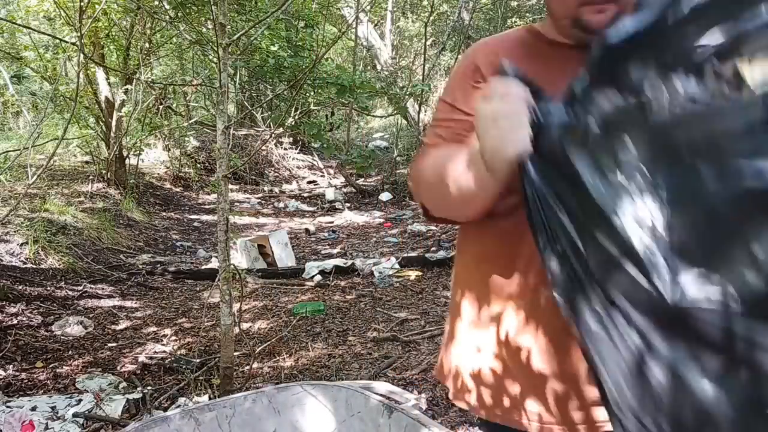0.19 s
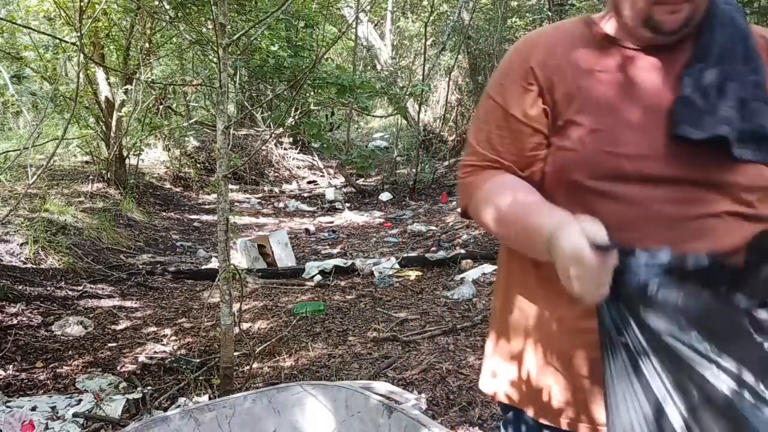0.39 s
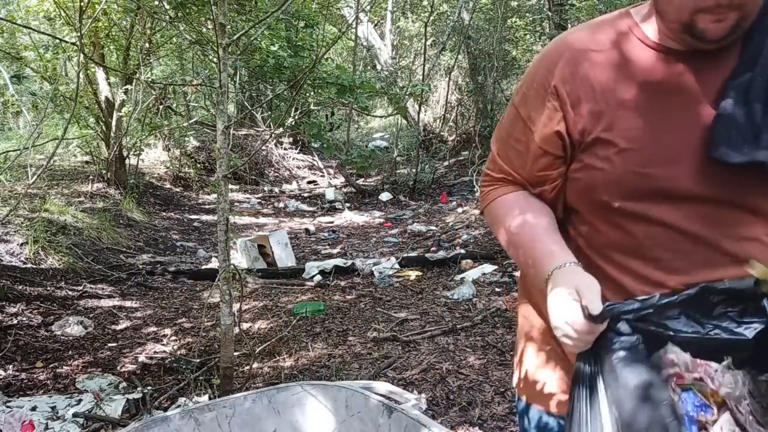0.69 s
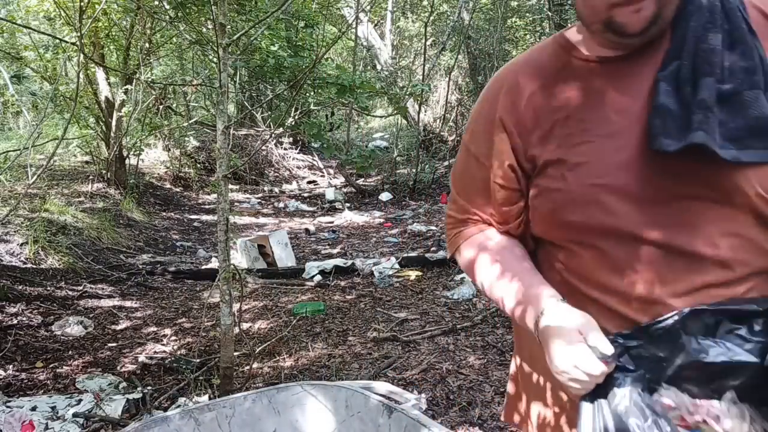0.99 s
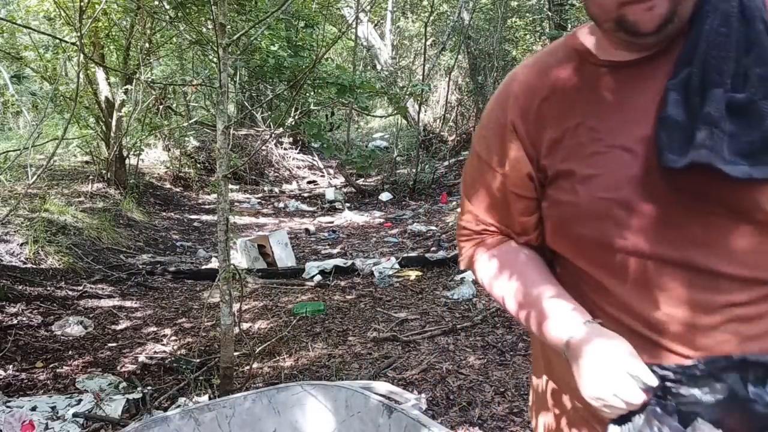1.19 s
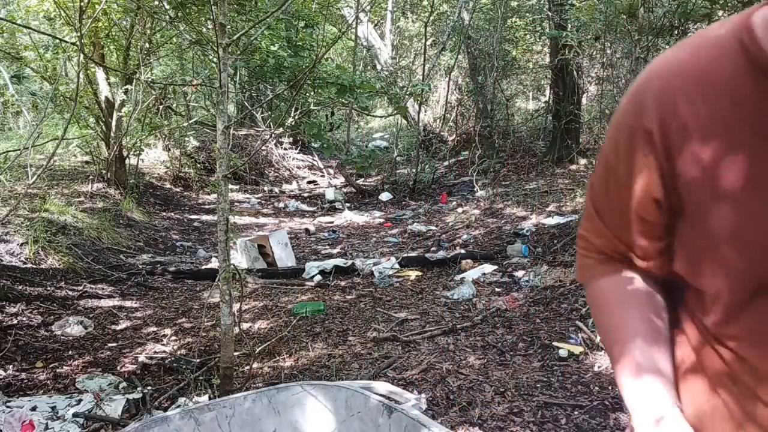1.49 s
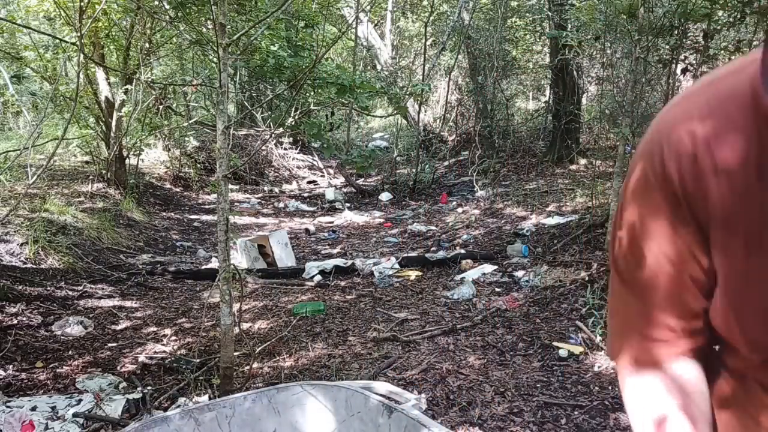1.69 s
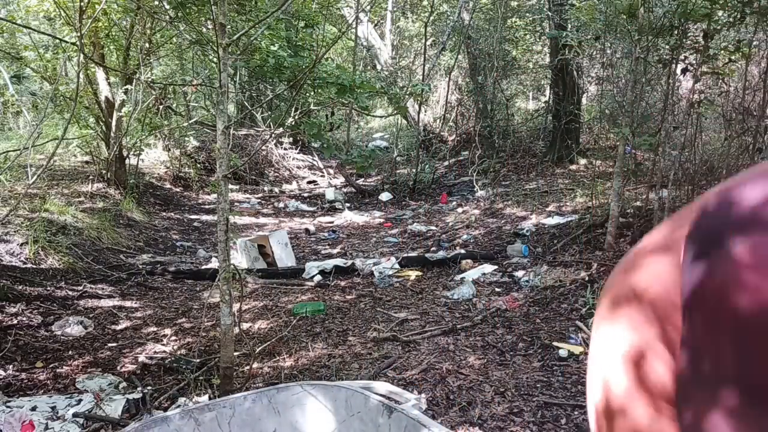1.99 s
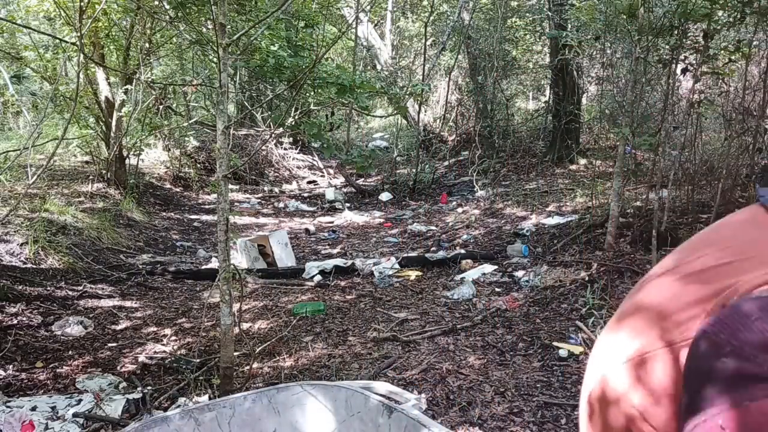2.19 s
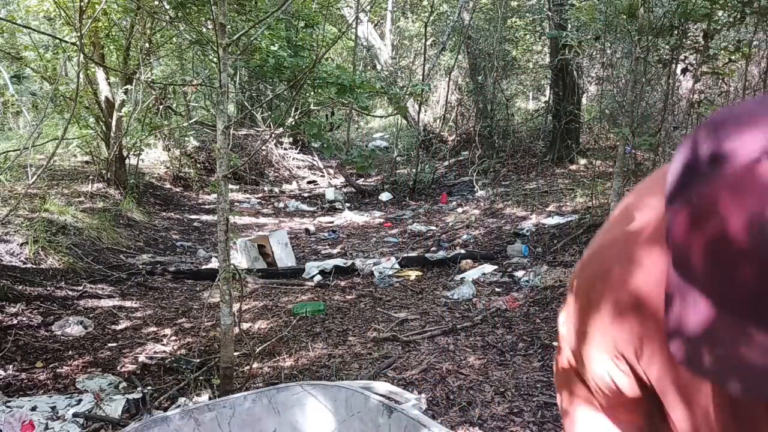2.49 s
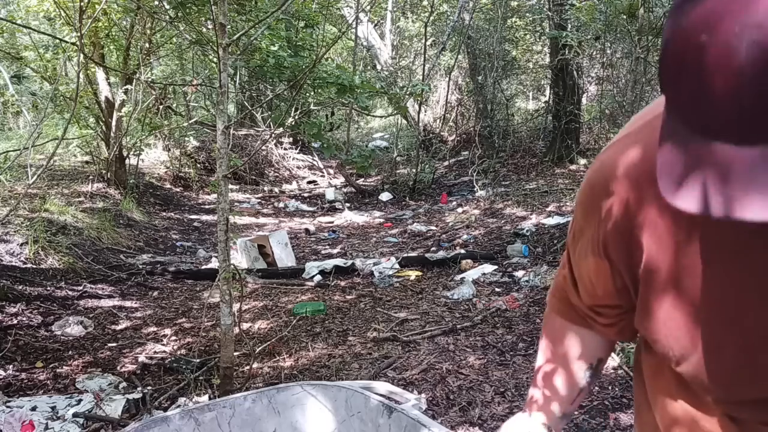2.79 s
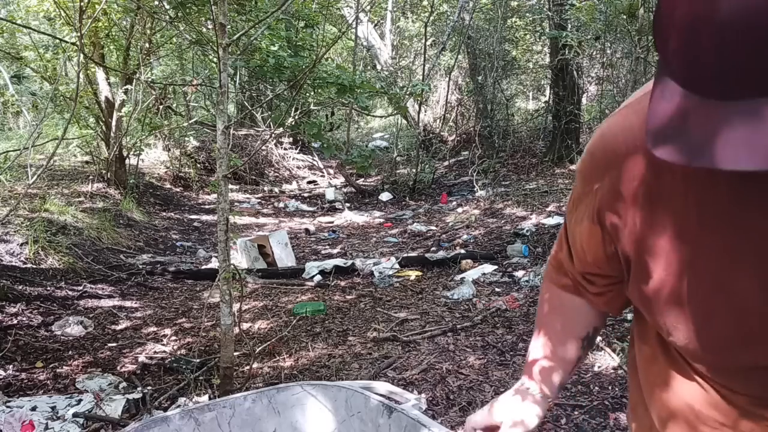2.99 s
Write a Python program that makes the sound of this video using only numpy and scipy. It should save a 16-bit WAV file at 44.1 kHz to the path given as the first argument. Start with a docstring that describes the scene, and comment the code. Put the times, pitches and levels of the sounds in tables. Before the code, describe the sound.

A thin plastic trash bag rustles, crackles and snaps in uneven bursts close by in quiet woods

```python
"""In quiet woods, a thin plastic trash bag is swung down, opened and handled close by on the right.
Clumped clicks over smooth noise make the sliding, crumpling and fluttering film; short tones flip creases.
Low noise is the air the bag shoves. Panels snap taut as noise cracks, papery slaps and sagging pops.
The bag bumps down once, softly, as two low tones close together and a dull noise knock.
A short noise tail scatters the bag's sound back from ground and trees, over steady noise for the woods."""
import sys
import numpy as np
from scipy import signal
from scipy.fft import rfft, irfft, next_fast_len
from scipy.io import wavfile
from scipy.ndimage import map_coordinates

SR = 44100
rng = np.random.default_rng(int(sys.argv[2]) if len(sys.argv) > 2 else 0)


def to_wav(s):
    """Save 16-bit WAV."""
    ch = np.atleast_2d(s).T  # columns
    pcm = np.round(np.clip(ch, -1, 1) * 32767)  # PCM
    wavfile.write(sys.argv[1], SR, pcm.astype(np.int16))


N = 136710  # length [samples]


def amp(db):
    """Decibels to gain."""
    return 10 ** (np.asarray(db) / 20)


def unit(x):
    """Scale to rms 1."""
    return x / np.sqrt(np.mean(x ** 2) + 1e-20)


def along(points, hz):
    """Read (frequency [Hz], value) points on a log frequency axis."""
    f, v = np.transpose(points)
    return np.interp(np.log(hz + 1), np.log(f + 1), v)


def curve(rows):
    """One value per sample from (time [s], value) rows."""
    s, v = np.transpose(rows)
    return np.interp(np.arange(N) / SR, s, v)


def wobble(rate):
    """A smooth random curve with `rate` knots a second."""
    knots = rng.standard_normal(N // 20)
    return map_coordinates(knots, [np.arange(N) * rate / SR], mode="wrap")


def filtered(x, response):
    """Multiply the spectrum of x by a response of frequency."""
    m = next_fast_len(N + SR // 2)
    return irfft(rfft(x, m) * response(np.fft.rfftfreq(m, 1 / SR)), m)[..., :N]


def coloured(x, points, size=4096):
    """Minimum-phase colouring: causal, so each click keeps its sharp front."""
    log_gain = np.log(amp(along(points, np.fft.rfftfreq(size, 1 / SR))))
    cepstrum = irfft(log_gain)
    # fold the cepstrum onto positive time
    cepstrum[1:size // 2] *= 2
    cepstrum[size // 2 + 1:] = 0
    impulse = irfft(np.exp(rfft(cepstrum)))
    return signal.fftconvolve(x, impulse[None], axes=1)[:, :N]


def add(track, s, sound):
    """Mix a sound into a track at time s."""
    part = track[..., int(round(s * SR)):][..., :sound.shape[-1]]
    part += sound[..., :part.shape[-1]]


# left-right likeness (frequency [Hz], coherence [0-1])
LIKENESS = [(60, 0.73), (300, 1), (600, 1), (1200, 0.55), (2500, 0.39), (5000, 0.2), (15000, 0.1)]


def spread(pair):
    """Blend two unrelated signals into left and right, with a likeness that varies with pitch."""
    def turn(hz):
        return np.arccos(np.clip(along(LIKENESS, hz), -1, 1)) / 2

    mid, side = filtered(pair, lambda hz: np.array([np.cos(turn(hz)), np.sin(turn(hz))]))
    return np.array([mid + side, mid - side])


def buckles(level, colour, rate, spread_db, rub, clump_db, clump_rate):
    """Tiny clicks of random size over the smooth rubbing of film on film, swelling in clumps."""
    happens = rng.random(N) < rate / SR
    sizes = happens * amp(spread_db * np.clip(rng.standard_normal(N), -2, 2))
    facing = 2 * np.pi * rng.random(N)
    clicks = unit(sizes * np.array([np.cos(facing), np.sin(facing)]))
    rubbing = rng.standard_normal((2, N))
    grain = np.sqrt(1 - rub) * clicks + np.sqrt(rub) * rubbing
    clumps = amp(clump_db * wobble(clump_rate))
    return unit(spread(coloured(grain * clumps, colour))) * amp(curve(level))


# sliding film, crumpling creases, fluttering large folds
# (time [s], level [dB], before the layer's trim)
SLIDE_LEVEL = [(0, -58.5), (.11, -49), (.18, -55.5), (.24, -39), (.3, -35), (.353, -25), (.395, -33.5),
               (.46, -41), (.53, -41.5), (.6, -49.5), (.8, -42), (.88, -47.5), (.97, -52.5), (1.12, -51),
               (1.26, -51), (1.31, -55.5), (1.39, -49.5), (1.48, -44), (1.59, -47), (1.68, -40),
               (1.81, -36), (1.94, -40.5), (1.99, -36), (2.14, -38), (2.175, -31), (2.21, -35),
               (2.245, -46), (2.275, -50.5), (2.31, -39.5), (2.5, -39), (2.66, -34.5), (2.74, -34),
               (2.77, -28), (2.82, -39.5), (2.9, -45.5), (2.94, -41.5), (3.1, -44.5)]
CRUMPLE_LEVEL = [(0, -68), (.11, -56), (.19, -54.5), (.24, -42), (.3, -42), (.365, -25.5), (.4, -34.5),
                 (.46, -44.5), (.53, -46.5), (.62, -54), (.72, -46), (.8, -48), (.88, -51), (.97, -58.5),
                 (1.12, -54.5), (1.3, -60), (1.39, -57.5), (1.48, -48.5), (1.6, -50), (1.8, -40),
                 (1.87, -38), (1.94, -42), (2.0, -37), (2.14, -37.5), (2.19, -32.5), (2.24, -46),
                 (2.275, -52), (2.32, -47), (2.46, -40.5), (2.53, -46.5), (2.66, -42.5), (2.78, -35),
                 (2.83, -48), (2.9, -52), (2.96, -49), (3.1, -48.5)]
FLUTTER_LEVEL = [(0, -61.5), (.17, -69.5), (.24, -49), (.3, -43.5), (.345, -32), (.378, -25.5), (.41, -35),
                 (.48, -48.5), (.57, -52.5), (.65, -56), (.715, -44.5), (.8, -55.5), (.93, -57),
                 (1.12, -53), (1.22, -65), (1.3, -57), (1.37, -75), (1.43, -53.5), (1.49, -50.5),
                 (1.55, -46), (1.67, -54), (1.78, -46.5), (1.88, -36), (2.0, -33), (2.13, -35),
                 (2.195, -33), (2.225, -43), (2.275, -51), (2.32, -39.5), (2.41, -45), (2.46, -37.5),
                 (2.53, -50.5), (2.63, -50), (2.7, -43.5), (2.79, -45.5), (2.84, -49.5), (2.9, -60.5),
                 (3.0, -53.5), (3.1, -55.5)]
# their spectra (frequency [Hz], relative level [dB per Hz])
SLIDE_SPECTRUM = [(1500, -53), (3500, -10.5), (5500, -3.5), (7000, -3), (9500, -2), (12200, 0), (14000, -2),
                  (16000, -4.5)]
CRUMPLE_SPECTRUM = [(500, -27), (1200, 0), (1900, 0.5), (2600, 0.5), (3500, 0), (4600, 0.5), (6200, -11),
                    (10000, -24)]
FLUTTER_SPECTRUM = [(20, -42), (80, -25.5), (130, -7), (170, -4.5), (230, 0), (400, 0), (600, 0),
                    (800, -0.5), (1150, -2), (1800, -8), (3000, -8), (6000, -51.5)]
SLIDE_TRIM_DB, CRUMPLE_TRIM_DB = 4.5, 3.0


def rustle():
    """Film buckles finely as it slides, more coarsely in its creases, and flutters in large folds."""
    # rate: clicks a second; rub: share of power in smooth rubbing; clump_rate: knots a second
    fizz = buckles(SLIDE_LEVEL, SLIDE_SPECTRUM, rate=7000, spread_db=11,
                   rub=0.74, clump_db=1.44, clump_rate=200)
    creases = buckles(CRUMPLE_LEVEL, CRUMPLE_SPECTRUM, rate=2200, spread_db=2,
                      rub=0.43, clump_db=1.7, clump_rate=130)
    folds = buckles(FLUTTER_LEVEL, FLUTTER_SPECTRUM, rate=600, spread_db=5,
                    rub=0.57, clump_db=1.08, clump_rate=80)
    return amp(SLIDE_TRIM_DB) * fizz + amp(CRUMPLE_TRIM_DB) * creases + folds


CREASE_RATE, CREASE_HZ = 170, 2695  # flips a second, middle pitch
CREASE_OCTAVES = 0.81  # half the reach of the pitch to either side
CREASE_CYCLES = 17  # cycles to fall 60 dB
CREASE_DB = -6.5  # relative to the untrimmed crumple level


def crinkles():
    """Single creases flip over, each ringing for a few cycles at its own pitch."""
    t, out = np.arange(SR // 50) / SR, np.zeros((2, N))
    for when, size, pitch, facing in rng.random((int(CREASE_RATE * N / SR), 4)):
        hz = min(CREASE_HZ * 2 ** (CREASE_OCTAVES * 2 * (2 * pitch - 1)), SR / 3)
        decay = amp(-60 * t * hz / CREASE_CYCLES)
        tick = size ** 2 * np.sqrt(hz) * decay * np.sin(2 * np.pi * hz * t)
        angle = 2 * np.pi * facing
        add(out, when * N / SR, np.outer([np.cos(angle), np.sin(angle)], tick))
    return unit(spread(out)) * amp(curve(CRUMPLE_LEVEL) + CREASE_DB)


# air pushed by the billowing bag (time [s], level [dB])
BILLOW_LEVEL = [(0, -69.5), (.3, -78), (.36, -43.5), (.4, -51.5), (.44, -54), (.52, -67), (.66, -71),
                (.71, -60), (.85, -69.5), (1.4, -75), (1.55, -63.5), (1.75, -70.5), (2.0, -54), (2.2, -55),
                (2.3, -66), (2.47, -55), (2.68, -74), (2.75, -58.5), (2.85, -68), (3.1, -68)]
# its spectrum (frequency [Hz], relative level [dB per Hz])
BILLOW_SPECTRUM = [(15, -30), (32, -9), (60, 2.5), (100, -3.5), (160, -10.5), (400, -46), (1500, -75)]


def billow():
    """The swelling bag shoves air, heard as low noise that comes and goes."""
    air = coloured(rng.standard_normal((2, N)), BILLOW_SPECTRUM)
    return unit(spread(air)) * amp(curve(BILLOW_LEVEL))


# woods spectrum (frequency [Hz], relative level [dB per Hz])
WOODS_SPECTRUM = [(20, -18), (60, -5), (150, -15), (500, -9), (1500, -20), (4500, -7), (8000, -14.5),
                  (16000, -24)]
WOODS_DB = -64.5


def quiet_woods():
    """A steady bed of coloured noise."""
    noise = coloured(rng.standard_normal((2, N)), WOODS_SPECTRUM)
    return amp(WOODS_DB) * unit(spread(noise))


SCATTER_DB, SCATTER_T60, SCATTER_RISE_S = -14, .085, .0015  # decay time [s], rise time constant [s]


def scatter(x):
    """A short, weak answer from the ground and the trees: a decaying noise tail."""
    t = np.arange(SR // 3) / SR
    envelope = amp(-60 * t / SCATTER_T60) * (1 - np.exp(-t / SCATTER_RISE_S))
    tail = rng.standard_normal((2, len(t))) * envelope
    echo = signal.fftconvolve(x, tail / np.linalg.norm(tail[0]), axes=1)[:, :N]
    return amp(SCATTER_DB) * echo


# panels snapping taut; levels stand before trim, and cracks and slaps before colouring too
# (time [s], crack level [dB], crack t60 [s], slap level [dB],
#  pop level [dB], settled pop pitch [Hz], pop t60 [s])
PANEL_SNAPS = [(.343, -31, .03, -24, -34, 1100, 0.017), (.363, -20, 0.023, -25, -24.5, 250, .03),
               (.378, -36, .02, -24, -25, 246, 0.039), (.611, -45, .01, -37, -41, 560, 0.017),
               (.698, -54, .02, -40, -37, 303, .035), (.722, -56, .02, -39, -36, 260, 0.033),
               (.988, -60, .005, -55, -28, 372, 0.02), (1.098, -44, 0.034, -38, -39.5, 800, .03),
               (1.133, -39, .008, -43, -47, 1090, 0.019), (1.471, -46, .015, -38, -50, 690, 0.018),
               (1.8096, -16, 0.014, -21.5, -20, 950, 0.017), (1.852, -31, 0.021, -21.5, -9, 940, 0.018),
               (1.923, -38, .015, -27, -24, 805, .025), (1.973, -17.5, 0.03, -20, -19, 560, 0.029),
               (1.9785, -18.5, 0.027, -24, -10.5, 505, .025), (2.0375, -16.5, 0.023, -23, -18, 578, 0.038),
               (2.0405, -21, .02, -35, -12, 491, 0.027), (2.0887, -8, 0.0039, -21, -7.5, 252, 0.023),
               (2.1156, -7.5, 0.0027, -26.5, -21, 350, 0.013), (2.163, -19, 0.02, -24.5, -27, 650, 0.018),
               (2.1805, -17.5, 0.013, -20.5, -15.5, 611, 0.03),
               (2.3004, -19.5, 0.01, -18.5, -20.5, 494, 0.033), (2.314, -40, 0.0071, -25, -26, 734, .014),
               (2.362, -29, 0.017, -35, -34, 647, .025), (2.391, -27, .01, -41, -17, 540, 0.02),
               (2.445, -25, 0.012, -37, -33, 454, 0.027), (2.482, -41, 0.011, -29.5, -31, 810, 0.018),
               (2.695, -41, .01, -30, -28.5, 393, 0.027), (2.793, -27, 0.011, -29, -32, 930, 0.027)]
# pop partials (multiple of the pitch, level [dB])
PANEL_PARTIALS = [(0.999, 0), (1.5, -6.5), (2.25, -8)]
# crack and slap spectra (frequency [Hz], gain [dB], before trim)
CRACK_SPECTRUM = [(100, -19.5), (500, -1), (1700, -0.5), (2600, -2.5), (3600, -0.5), (4900, -1), (6600, -8),
                  (10000, -7.5), (16000, -23)]
SLAP_SPECTRUM = [(60, -32), (250, -12), (500, -3), (1100, 2.5), (1900, 0), (2700, -15.5), (6000, -36.5)]
CRACK_TRIM_DB, SLAP_TRIM_DB, POP_TRIM_DB = 3, 15.0, 1.5
CRACK_SIDE_DB = -3  # side against mid
SLAP_T60, SLAP_RISE_S = 0.025, 0.0021  # decay time [s], rise time constant [s]
# the pitch starts high by the fraction POP_SAG and sags as the panel slackens; time constants [s]
POP_RISE_S, POP_SAG, POP_SAG_S = 0.002, 0.71, 0.0017


def snaps():
    """A panel jerks taut: a sharp crack, a papery slap, then a few cycles of a sagging pop."""
    t = np.arange(SR // 8) / SR
    cracks, slaps, pops = np.zeros((2, N)), np.zeros((2, N)), np.zeros(N)
    slap_rise = 1 - np.exp(-t / SLAP_RISE_S)
    pop_rise = 1 - np.exp(-t / POP_RISE_S)
    for s, crack_db, crack_t60, slap_db, pop_db, hz, t60 in PANEL_SNAPS:
        crack = amp(crack_db - 60 * t / crack_t60) * rng.standard_normal((2, len(t)))
        add(cracks, s, crack)
        slap = amp(slap_db - 60 * t / SLAP_T60) * slap_rise * rng.standard_normal((2, len(t)))
        add(slaps, s, slap)
        cycles = hz * (t + POP_SAG * POP_SAG_S * (1 - np.exp(-t / POP_SAG_S)))
        ring = np.zeros(len(t))
        for k, db in PANEL_PARTIALS:
            # each partial is slightly mistuned; higher ones die sooner
            phase = k * cycles * rng.normal(1, 0.025) + rng.random()
            ring += amp(db - 60 * t * np.sqrt(k) / t60) * np.sin(2 * np.pi * phase)
        add(pops, s, amp(pop_db + POP_TRIM_DB) * ring * pop_rise)
    mid, side = amp(CRACK_TRIM_DB) * coloured(cracks, CRACK_SPECTRUM)
    side = side * amp(CRACK_SIDE_DB)
    wide_cracks = np.array([mid + side, mid - side])
    wide_slaps = amp(SLAP_TRIM_DB) * spread(coloured(slaps, SLAP_SPECTRUM))
    return wide_cracks + wide_slaps + pops


# the bag bumping down (time [s], level before trim [dB], pitch [Hz], t60 [s])
BUMPS = [(2.426, -20, 100, 0.031), (2.435, -21.5, 122, 0.046)]
# knock spectrum (frequency [Hz], gain [dB])
KNOCK_SPECTRUM = [(40, -14), (150, -3), (300, 0), (520, 0), (800, -24), (2000, -30), (6000, -60)]
THUMP_TRIM_DB, THUMP_RISE_S = 2.5, 0.0038  # rise time constant [s]
KNOCK_DB, KNOCK_T60 = 13, 0.049  # noise over the bump before colouring, decay time [s]


def thump():
    """The soft weight of the bag lands with a low double bump and a dull knock."""
    t, bumps, knocks = np.arange(SR // 4) / SR, np.zeros(N), np.zeros((1, N))
    for s, db, hz, t60 in BUMPS:
        rise = amp(db + THUMP_TRIM_DB) * (1 - np.exp(-t / THUMP_RISE_S))
        add(bumps, s, rise * amp(-60 * t / t60) * np.sin(2 * np.pi * hz * t))
        add(knocks, s, rise * amp(KNOCK_DB - 60 * t / KNOCK_T60) * rng.standard_normal(len(t)))
    return bumps + coloured(knocks, KNOCK_SPECTRUM)


LAG_S = 0.0002275  # left behind right


def scene():
    """The bag on the right, reaching the right channel first, in quiet woods."""
    bag = rustle() + crinkles() + billow() + snaps() + thump()
    # half the lag delays the left, half advances the right
    bag = filtered(bag, lambda hz: np.exp(1j * np.pi * hz * LAG_S * np.array([[-1], [1]])))
    return bag + scatter(bag) + quiet_woods()


# channel balance (frequency [Hz], left over right [dB])
CHANNEL_BALANCE = [(60, 3), (140, 1), (300, 0.5), (600, -1), (1100, -1.7), (2000, -0.3), (4500, 0.5),
                   (8000, 0.5), (13000, 3.4)]
TOP_HZ = 15950


def record(dry):
    """The two channels differ a little in colour; nothing is kept above the band limit."""
    halves = np.array([[.5], [-.5]])
    return filtered(dry, lambda hz: amp(along(CHANNEL_BALANCE, hz) * halves) * (hz < TOP_HZ))


dry = scene()
out = record(dry)
to_wav(out)
```